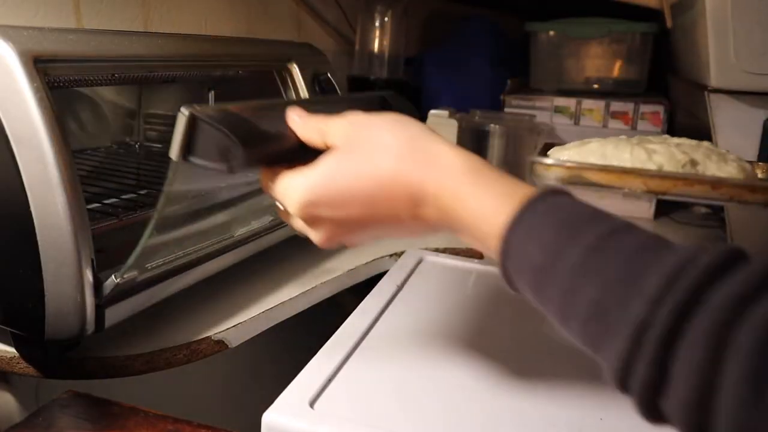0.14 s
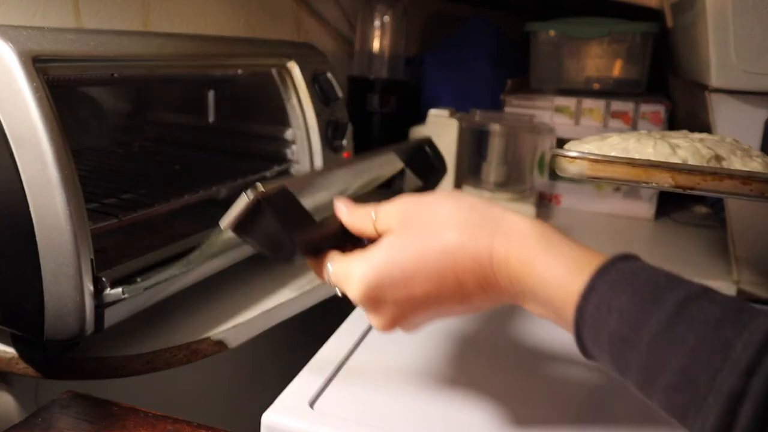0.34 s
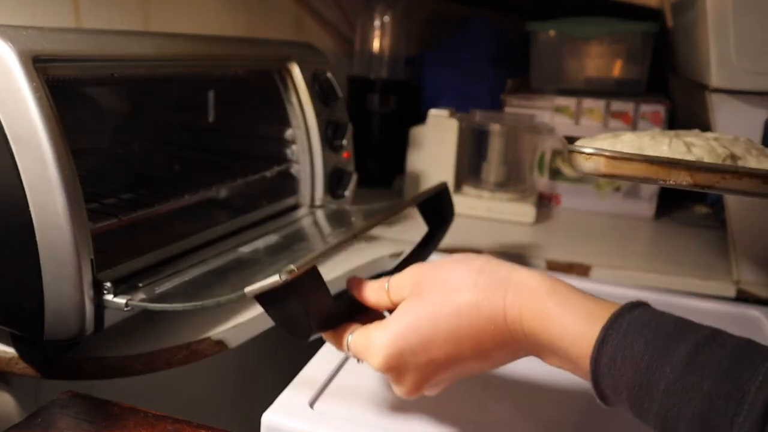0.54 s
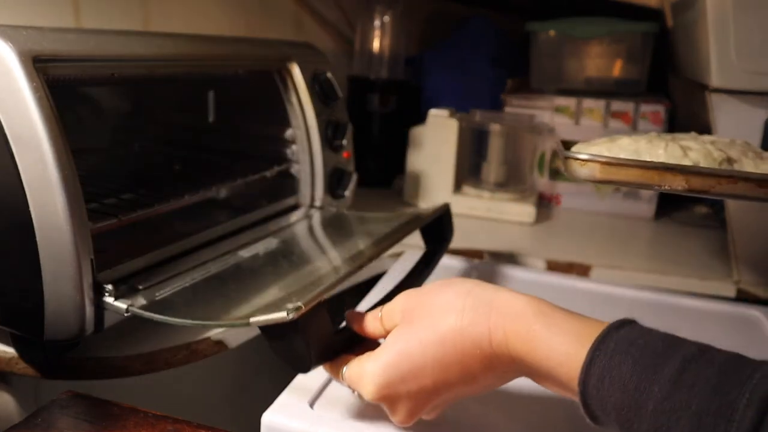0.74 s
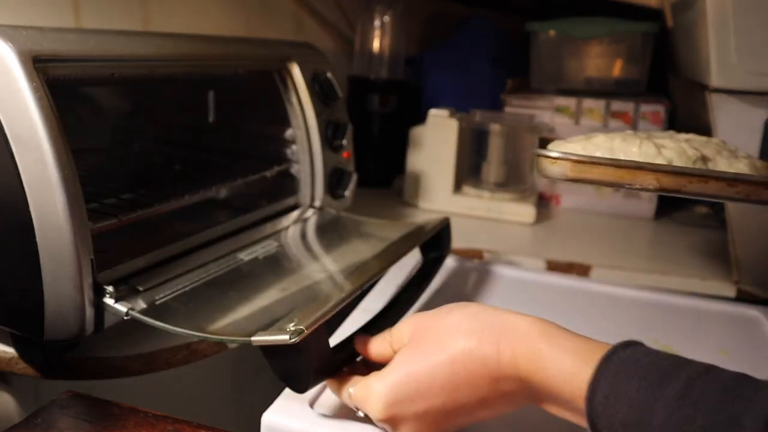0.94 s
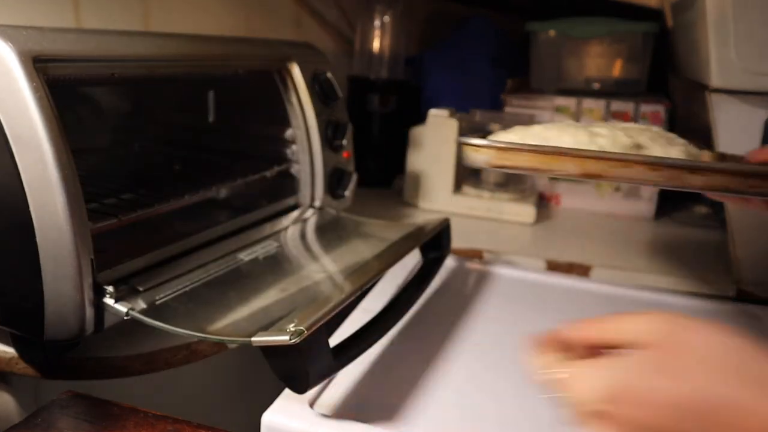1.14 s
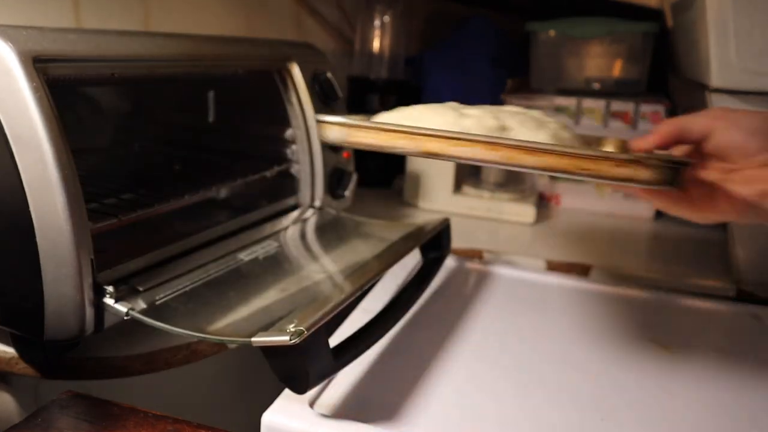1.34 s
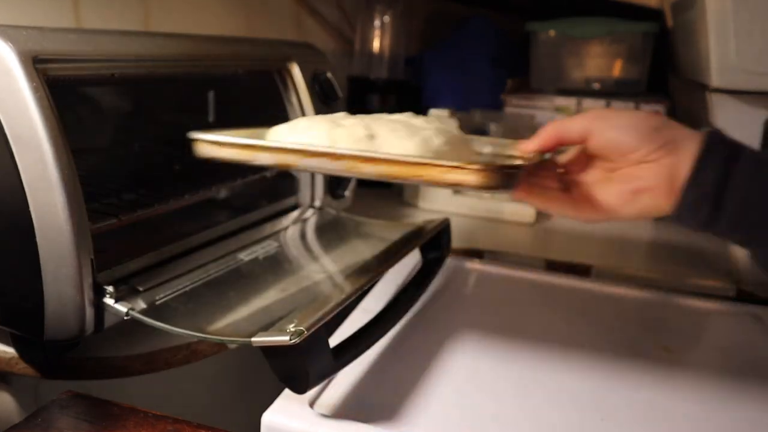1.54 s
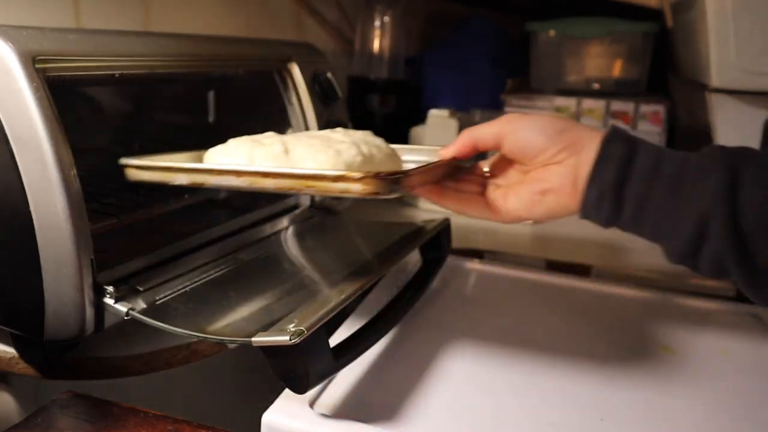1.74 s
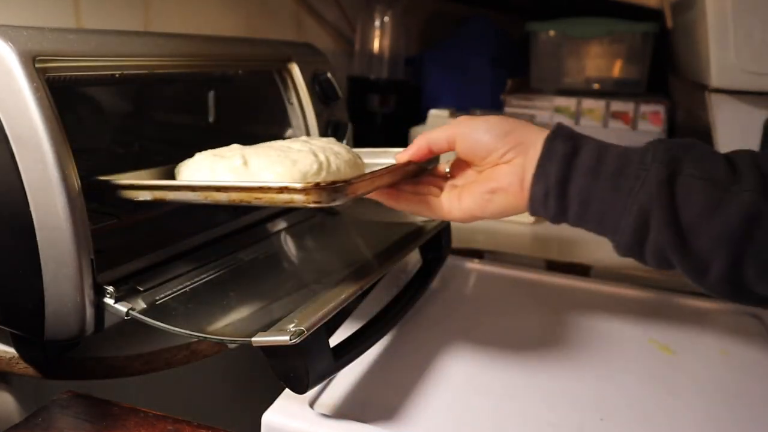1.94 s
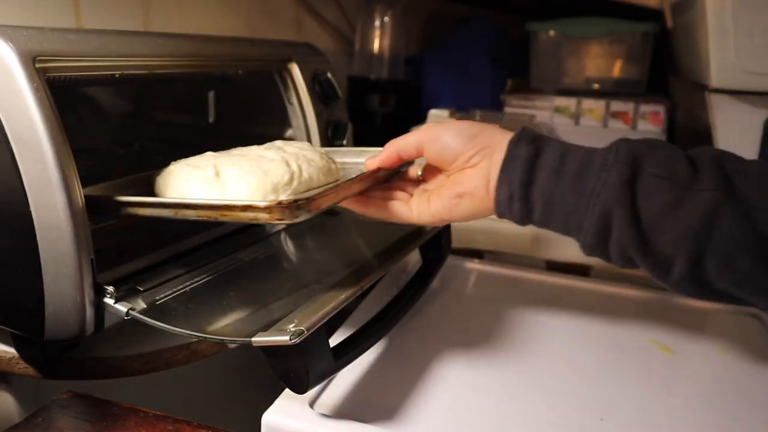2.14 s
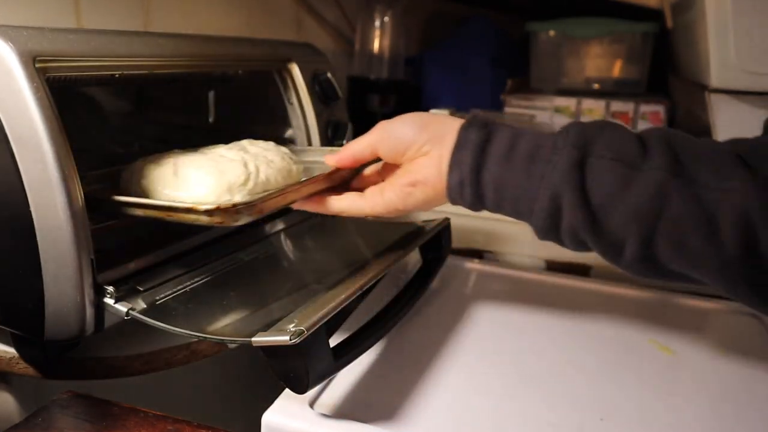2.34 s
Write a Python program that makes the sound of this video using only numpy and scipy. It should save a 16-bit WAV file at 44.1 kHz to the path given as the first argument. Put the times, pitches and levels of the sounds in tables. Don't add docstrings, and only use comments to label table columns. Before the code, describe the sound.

Close stereo pickup in a small kitchen with low rumble: thin metal oven door creaks and clicks down, thuds, handle ticks; after a quiet sleeve rustle, a metal baking tray clatters loudly against the rack.

```python
import sys
import numpy as np
from scipy import signal
from scipy.fft import rfft, irfft
from scipy.io import wavfile
from scipy.ndimage import uniform_filter1d

SR = 44100
rng = np.random.default_rng(int(sys.argv[2]) if len(sys.argv) > 2 else 0)


def dump(signal):
    limited = np.clip(np.atleast_2d(signal).T, -1, 1)
    pcm = np.round(limited * 32767).astype(np.int16)
    wavfile.write(sys.argv[1], SR, pcm)


def amplitude_ratio(level_db):
    exponent = np.asarray(level_db, float) / 20
    return 10 ** exponent


N = 105884
RESPONSE_SAMPLES = 8192

# (frequency [Hz], level [dB])
FAR_SIDE = [(60, -32), (200, -4), (600, 1.5), (2400, 5.5), (12000, 7)]
# (frequency [Hz], level [dB])
NEAR_SIDE = [(60, -41), (250, -22.5), (700, -7.5), (2400, 1.5), (12000, 7)]

# (frequency [Hz], density [dB per Hz])
AIR_SPECTRUM = [(90, -12.5), (200, -9.5), (500, -15), (2000, -26), (6000, -38), (8000, -43), (11500, -48.5),
                (15000, -85)]
# (time [s], level [dB])
AIR_LEVEL = [(0, -48), (.3, -49.5), (.5, -49.5), (1.1, -50.5), (1.6, -51), (2.0, -55)]
# (frequency [Hz], density [dB per Hz])
RUMBLE_SPECTRUM = [(20, -33), (40, -11), (62, 5), (80, -3), (115, -8.5), (200, -17.5), (350, -52)]
# (time [s], level [dB])
RUMBLE_LEVEL = [(0, -45.5), (.3, -47), (.85, -48.5), (.92, -47.5), (1.06, -42.5), (1.15, -49), (1.25, -40),
                (1.32, -45), (1.41, -38.5), (1.46, -51.5), (1.5, -38), (1.54, -50), (1.65, -44),
                (1.75, -50), (2.1, -45), (2.17, -39.5), (2.28, -44), (2.4, -42.5)]
# (frequency [Hz], density [dB per Hz])
CLOTH_SPECTRUM = [(1500, 1), (3000, 1), (5900, -1.5), (8000, -9), (11400, 0), (13000, -7), (15500, -4.5)]
# (time [s], level [dB])
SLEEVE_LEVEL = [(1.08, -74), (1.2, -60.5), (1.37, -74), (1.39, -55.5), (1.45, -52), (1.62, -60),
                (1.66, -74), (2.0, -82)]

# (time [s], level [dB])
PULL_LEVEL = [(0, -45.5), (.02, -39.5), (.04, -38.5), (.07, -42.5), (.11, -58), (.3, -56.5)]
# (frequency [Hz], level [dB], T60 [s])
PULL_MODES = [(255, 4, .07), (1800, -4, .02), (2620, -6, .015), (3150, -2, .016), (3500, -5, .016),
              (4300, -8, .016)]
# (time [s], level [dB])
SWING_LEVEL = [(.35, -56), (.378, -37), (.43, -38.5), (.47, -40.5), (.51, -45), (.55, -40.5), (.59, -52),
               (.62, -58), (.66, -75)]
# (frequency [Hz], density [dB per Hz])
HINGE_SPECTRUM = [(59, -54), (100, -16), (252, 2.5), (310, -9.5), (391, 1.5), (513, -12), (5150, -18),
                  (11000, -36.5), (15000, -121)]
# (frequency [Hz], width [Hz], level [dB])
HINGE_PEAKS = [(108, 15, -7), (167, 12, -3), (234, 18, -3), (257, 15, 3), (434, 19, -9), (395, 19, -4),
               (614, 22, -11), (1185, 35, -8), (1235, 30, -6), (1750, 40, -17), (2420, 50, -11),
               (3035, 66, -11), (3896, 79, -11), (4960, 150, -22)]

# (time [s], peak [dB], tilt [dB per octave], rattle [s], T60 [s])
SNAPS = [(0.3568, -34, -0.7, 0.0076, 0.036), (0.373, -32.5, -2, 0.0032, 0.046),
         (.393, -31.5, 2.5, 0.0096, 0.034), (0.4107, -35, 4, 0.0032, 0.049),
         (0.452, -34, -0.5, 0.0049, 0.2), (0.497, -34, -1.3, 0.0072, 0.13),
         (0.5264, -28.5, 0.2, 0.0094, 0.09), (.565, -30.5, -5.5, 0.01, 0.27),
         (.607, -34, -3, 0.0016, 0.048), (0.652, -34, 0, .008, 0.077), (0.6599, -23, -1, 0.0091, 0.16),
         (.705, -38.5, -3.5, .01, 0.065), (0.7519, -31, -0.6, 0.0023, 0.14),
         (.843, -24.5, 3.5, 0.0059, 0.12), (0.867, -28.5, -7, 0.0068, 0.046)]
# (frequency [Hz], density [dB per Hz])
DOOR_SPECTRUM = [(88, -41), (150, -6.5), (954, -3), (2140, -7.5), (2650, -2.5), (8580, -14), (10600, -14),
                 (13400, -27), (15000, -88)]
# (frequency [Hz], level [dB], T60 [s])
DOOR_MODES = [(760, -5, .06), (1050, -6, .03), (1220, -7, .03), (1550, -7, .03), (2000, -6, .025),
              (2630, -5, .03), (3100, -2, .03), (4705, 0, .022), (9860, -5, .011)]
# (frequency [Hz], density [dB per Hz])
THUD_SPECTRUM = [(40, -16), (70, -10), (170, -1), (300, -2), (600, -16), (1000, -22), (1500, -45)]
# (frequency [Hz], level [dB], T60 [s])
THUD_MODES = [(168, 0, .15), (338, -1, 0.12), (418, -1, 0.069), (490, -8, .1), (607, -15, 0.057),
              (956, -7, 0.04)]
# (frequency [Hz], density [dB per Hz])
LATCH_SPECTRUM = [(100, -21), (400, -5.5), (3500, -13.5), (7000, -19.5), (11000, -21.5), (15000, -57)]
# (frequency [Hz], level [dB], T60 [s])
LATCH_MODES = [(480, -8, .06), (720, -7, .06), (885, -10, .04), (1215, -6, .04), (1378, -5, .035),
               (1725, -2, .022), (1890, -2, .022), (2075, -6, .025), (2910, 2, .026), (3050, -3, .02),
               (3295, 2, .03), (3650, -3, .02), (4270, -4, .025), (4830, -11, .02)]

# (time [s], peak [dB], tilt [dB per octave], rattle [s], T60 [s])
KNOCKS = [
    (2.0074, -18, 1.46, 0.0098, 0.1),
    (2.014, -21, 0.6, 0.0094, 0.22),
    (2.058, -28, -0.5, 0.012, 0.32),
    (2.1486, -16, 4, 0.0062, 0.082),
    (2.154, -15, 0.66, 0.012, 0.18),
    (2.177, -18, -1, 0.0055, 0.2),
    (2.201, -25, -2, 0.0096, 0.28),
]
# (time [s], level [dB], tilt [dB per octave])
TOUCHES = [(2.0078, -7, 2.5), (2.0115, -5.5, 1.5), (2.0182, -11, -6), (2.026, -10, -2), (2.0425, -8, 0),
           (2.049, -15, 6), (2.067, -17, 2), (2.1495, -4, 19), (2.153, 0, 5.5), (2.16, -8, 1.5),
           (2.1654, -6.5, -1.5), (2.1701, -7.5, 3), (2.178, -9.5, 2), (2.185, -4, -2.5), (2.2008, -16, 4)]
# (frequency [Hz], density [dB per Hz])
TRAY_SPECTRUM = [(71, -14.5), (120, -18), (298, -2), (818, -4), (1000, -5), (2290, -7.5), (4840, -15.5),
                 (11300, -24), (15000, -49)]
# (frequency [Hz], level [dB], T60 [s])
TRAY_MODES = [(235, -5, .08), (353, -5, .08), (646, -2, .08), (833, -4, .07), (1092, -4, .05),
              (1291, -5, .05), (1653, -3, .05), (2755, 1, .045), (3003, 2, .04), (3450, -3, .03),
              (4245, -7, .03), (5300, -3, .025), (6500, -9, .03), (7700, -12, .03)]
# (frequency [Hz], level [dB], T60 [s])
RACK_MODES = [(307, -1, .1), (351, -4, .08), (423, -3, .08), (640, -5, .07), (765, -5, .06), (839, -4, .06),
              (1101, -4, .05), (1235, -3, .05), (1413, -2, .05), (1645, 0, .06), (1900, -3, .04),
              (2290, -2, .04), (2906, -4, .04), (9044, -6, .03)]
# (time [s], level [dB])
SLIDE_LEVEL = [(2.2, -58), (2.27, -44), (2.3, -40.5), (2.35, -41.5), (2.4, -40)]
# (frequency [Hz], density [dB per Hz])
SLIDE_SPECTRUM = [(88, -16), (150, -19), (257, -12), (450, -15.5), (850, -15.5), (10000, -39), (15000, -43)]

CONTACTS_PER_S, CONTACT_SPREAD_DB, HIT_OFFSET_DB = 12000, 2.5, -8
SAME_SIGN_SHARE = .65
TREBLE_HZ, TREBLE_DECAY_SHARE = 4500, 0.24
RING_RISE_S = .0005
KITCHEN_DB, KITCHEN_TILT_DB, KITCHEN_T60_S = -12, -1.5, .26
PING_S, PING_HZ, PING_DB, PING_T60_S, PING_WOBBLE = 1.51, 795, -50, 0.1, .03
THUD_S, THUD_DB, THUD_RISE_S, THUD_T60_S = .862, -36, 0.024, 0.27
LATCH_S, LATCH_DB, LATCH_BUZZ_DB = 1.0267, -3.5, -39
RACK_FROM_S = 2.1
PEAK_CEILING = .6


def at_hz(points, hz):
    p = np.array(points)
    return np.interp(np.log(hz), np.log(p[:, 0]), p[:, 1])


def level(rows, fade_s=0.014):
    s, db = np.transpose(rows)
    s = np.r_[s[0] - fade_s, s, s[-1] + fade_s]
    db = np.r_[db[0] - 40, db, db[-1] - 40]
    return amplitude_ratio(np.interp(np.arange(N) / SR, s, db))


def causal(db):
    cep = irfft(np.log(amplitude_ratio(db)))
    cep[1:RESPONSE_SAMPLES // 2] *= 2
    cep[RESPONSE_SAMPLES // 2 + 1:] = 0
    return irfft(np.exp(rfft(cep)))


def body(spectrum, side, tilt_db=0., modes=(), ring_db=0., flip=-1, vary_db=2.):
    hz = np.maximum(np.arange(RESPONSE_SAMPLES // 2 + 1) * SR / RESPONSE_SAMPLES, 10)
    t = np.arange(RESPONSE_SAMPLES) / SR
    broad = causal(at_hz(spectrum, hz) + tilt_db * np.log2(np.maximum(hz, 200) / 2000))
    response = broad / np.linalg.norm(broad) * np.ones((2, 1))
    if len(modes):
        rings = np.zeros((2, RESPONSE_SAMPLES))
        for k, (f, db, t60) in enumerate(modes):
            start_db = db + tilt_db * np.log2(f / 2000) + rng.normal(0, vary_db, (2, 1))
            rings += amplitude_ratio(start_db - 60 * t / t60) * np.sin(2 * np.pi * f * t) * flip ** k
        rings *= np.minimum(t / RING_RISE_S, 1)
        rings /= np.linalg.norm(rings, axis=1, keepdims=True)
        response = (response + amplitude_ratio(ring_db) * rings) / np.sqrt(1 + amplitude_ratio(2 * ring_db))
    mid = np.r_[0, response[0, :-1]]
    return np.array([mid, signal.fftconvolve(response[1], causal(at_hz(side, hz)))[:RESPONSE_SAMPLES]])


def sound(drive, response):
    return signal.fftconvolve(drive, response, axes=1)[:, :drive.shape[1]]


def contacts(count, rate_per_s, spread_db):
    sizes = amplitude_ratio(spread_db * np.minimum(rng.exponential(1, count), 4))
    sizes = sizes * (rng.random(count) < rate_per_s / SR)
    mid_sign = rng.choice([-1, 1], count)
    relative_sign = np.where(rng.random((2, count)) < [[1], [SAME_SIGN_SHARE]], 1, -1)
    return sizes * mid_sign * relative_sign / np.sqrt(np.mean(sizes ** 2))


def tick(s, db, response):
    impulse = np.arange(N) == int(s * SR)
    return sound(amplitude_ratio(db) * impulse * np.ones((2, 1)), response)


def blow(s, db, rattle_s, t60_s, response, rise_s=0.00043,
         rate_per_s=CONTACTS_PER_S, spread_db=CONTACT_SPREAD_DB):
    t = np.arange(SR // 2) / SR
    touch = contacts(SR // 2, rate_per_s, spread_db)
    dull = signal.lfilter(*signal.butter(1, TREBLE_HZ, fs=SR), touch)
    fall_db = -60 * np.maximum(t - rattle_s, 0) / t60_s
    drive = dull * amplitude_ratio(db + fall_db) + (touch - dull) * amplitude_ratio(db + fall_db / TREBLE_DECAY_SHARE)
    drive *= np.minimum(t / rise_s, 1)
    out, i = np.zeros((2, N + SR)), int(s * SR)
    out[:, i:i + len(t)] = sound(drive, response)
    return out[:, :N]


def steady(rows, spectrum, even=0.):
    noise = rng.standard_normal((2, N + RESPONSE_SAMPLES))
    noise = sound(noise, body(spectrum, FAR_SIDE))[:, RESPONSE_SAMPLES:]
    power = uniform_filter1d(noise[0] ** 2, size=2000) + 0.025
    return noise / power ** (even / 2) * level(rows, .05)


def rumble():
    return steady(RUMBLE_LEVEL, RUMBLE_SPECTRUM, 0.93)


def room_air():
    return steady(AIR_LEVEL + [(2.4, AIR_LEVEL[-1][1])], AIR_SPECTRUM)


def sleeve():
    return steady(SLEEVE_LEVEL, CLOTH_SPECTRUM)


def kitchen(x):
    t = np.arange(SR // 2) / SR
    tail = rng.standard_normal((2, len(t))) * amplitude_ratio(-60 * t / KITCHEN_T60_S) * np.minimum(t / 0.0027, 1)
    tail = sound(tail, body([(200, 0), (12800, 6 * KITCHEN_TILT_DB)], [(200, 1.5), (12800, 0.46)]))
    return amplitude_ratio(KITCHEN_DB) * sound(x, tail / np.linalg.norm(tail[0]))


def ping():
    t = np.maximum(np.arange(N) / SR - PING_S, 0)
    shape = np.minimum(t / 0.0049, 1) * amplitude_ratio(PING_DB - 60 * np.maximum(t - .04, 0) / PING_T60_S)
    wobble = uniform_filter1d(rng.standard_normal(N), size=400) * 20
    phase = 2 * np.pi * PING_HZ * np.cumsum(1 + PING_WOBBLE * wobble) / SR
    hum = np.sin(phase) + amplitude_ratio(-9) * np.sin(1.94 * phase)
    return shape * hum * amplitude_ratio(np.array([[-.1], [1.5]]))


def hinge():
    frame_modes = [(hz, db, 3.3 / width_hz) for hz, width_hz, db in HINGE_PEAKS]
    slips = contacts(N, 1500, 3.2) * level(SWING_LEVEL)
    swing = sound(slips, body(HINGE_SPECTRUM, NEAR_SIDE, -.01, frame_modes, -2.5))
    tug = contacts(N, CONTACTS_PER_S, CONTACT_SPREAD_DB) * level(PULL_LEVEL)
    return swing + sound(tug, body(HINGE_SPECTRUM, NEAR_SIDE, -0.17, PULL_MODES, 1.5))


def door():
    out = np.zeros((2, N))
    for s, db, tilt_db, rattle_s, t60_s in SNAPS:
        panel = body(DOOR_SPECTRUM, NEAR_SIDE, tilt_db, DOOR_MODES, -11.5)
        out += blow(s, db + HIT_OFFSET_DB, rattle_s, t60_s, panel)
    stop = body(THUD_SPECTRUM, NEAR_SIDE, 0., THUD_MODES, 2)
    out += blow(THUD_S, THUD_DB, THUD_RISE_S, THUD_T60_S, stop, THUD_RISE_S)
    handle = body(LATCH_SPECTRUM, NEAR_SIDE, 0., LATCH_MODES, 18, flip=0.96, vary_db=0.5)
    out += tick(LATCH_S, LATCH_DB, handle)
    return out + blow(LATCH_S, LATCH_BUZZ_DB, 0.0045, 0.037, body(LATCH_SPECTRUM, NEAR_SIDE))


def tray():
    def struck(s, tilt_db, ring_db):
        modes = TRAY_MODES if s < RACK_FROM_S else RACK_MODES
        return body(TRAY_SPECTRUM, NEAR_SIDE, tilt_db, modes, ring_db)

    out = np.zeros((2, N))
    for s, db, tilt_db, rattle_s, t60_s in KNOCKS:
        out += blow(s, db + HIT_OFFSET_DB, rattle_s, t60_s, struck(s, tilt_db, -8.5),
                    rise_s=0.00049, rate_per_s=6000, spread_db=3.0)
    for s, db, tilt_db in TOUCHES:
        out += tick(s, db, struck(s, tilt_db, 6))
    scrape = contacts(N, 9000, 2.0) * level(SLIDE_LEVEL, 0.024)
    return out + sound(scrape, body(SLIDE_SPECTRUM, NEAR_SIDE, 0., RACK_MODES, ring_db=-26))


def scene():
    near = hinge() + door() + ping() + tray()
    mid, side = near + kitchen(near) + sleeve() + room_air() + rumble()
    return np.array([mid + side, mid - side])


def band_limit(x):
    return signal.sosfilt(signal.butter(12, 16290, fs=SR, output="sos"), x)


def record(dry):
    mix = PEAK_CEILING * np.tanh(dry / PEAK_CEILING)
    return band_limit(mix)


dry = scene()
out = record(dry)
dump(out)
```